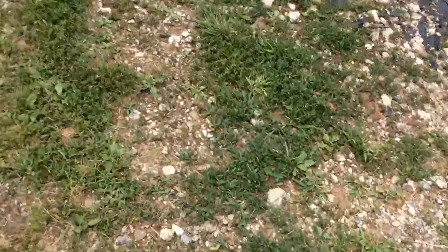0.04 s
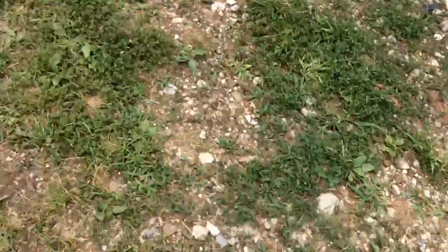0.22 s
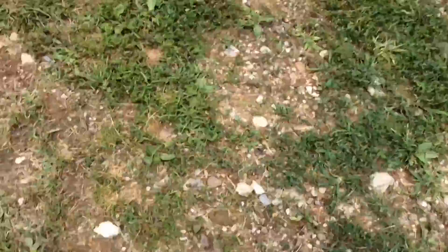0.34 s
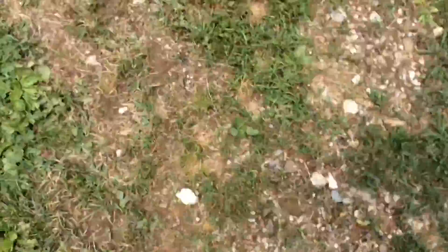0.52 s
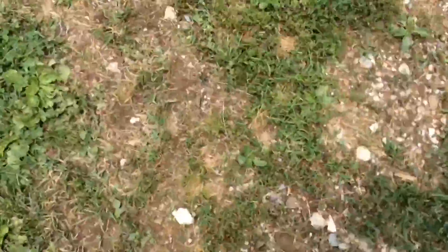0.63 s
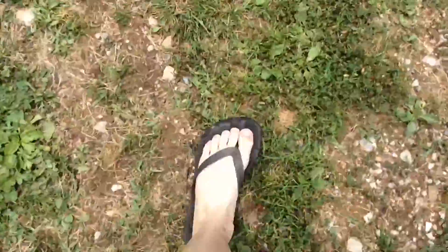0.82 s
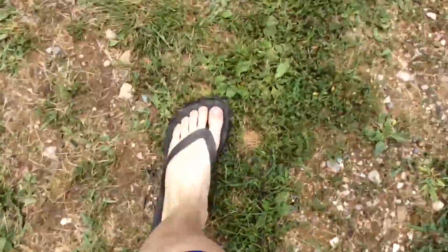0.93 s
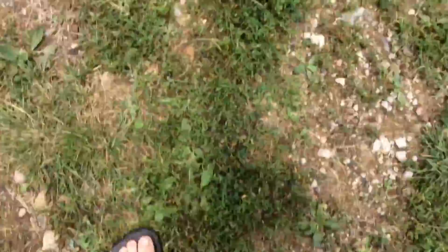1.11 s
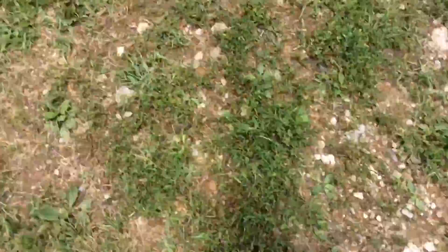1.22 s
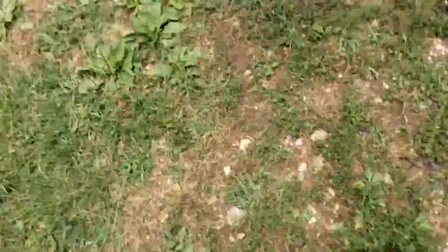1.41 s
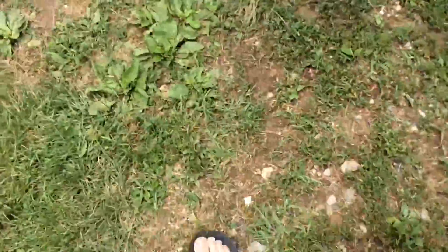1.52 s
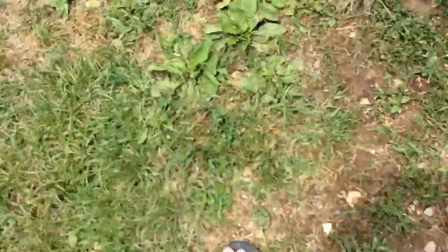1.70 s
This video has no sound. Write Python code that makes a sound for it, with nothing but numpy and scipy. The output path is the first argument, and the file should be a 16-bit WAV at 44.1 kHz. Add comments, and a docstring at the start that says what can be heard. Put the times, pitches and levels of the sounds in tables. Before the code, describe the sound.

Close footsteps in flip-flops start with a scuff and one sharp heel slap with a dull thud. The rubber then pops quietly as the soles rub over earth and grass and small stones click, over a faint outdoor hiss.

```python
"""Someone walks in flip-flops over dry, gritty ground with patches of grass.
First a sole scuffs the ground, then its rubber slaps once loudly against the heel, with a dull thud.
After that it keeps popping softly as it flexes under the foot, while the soles rub over earth, grit
and grass, small stones and stalks snap, and the footfalls thud. The walk ends in a soft swish of
grass. A faint hiss of still open air lies under it all."""
import sys
import numpy as np
from scipy import signal
from scipy.fft import rfft, irfft
from scipy.io import wavfile

SR = 44100
rng = np.random.default_rng(int(sys.argv[2]) if len(sys.argv) > 2 else 0)


def pcm_store(signal):
    """Save signal as 16-bit PCM."""
    levels = np.round(np.clip(np.atleast_2d(signal), -1, 1) * 32767)
    wavfile.write(sys.argv[1], SR, levels.astype(np.int16).T)


N = 77175
T = np.arange(N) / SR  # time of each sample [s]
HZ = np.maximum(np.arange(N // 2 + 1) * SR / N, 1)  # frequency of each point in a spectrum [Hz]


def sole_pops():
    """The rubber sole meets the foot: each pop swells, drops in pitch as the rubber settles, and dies."""
    # One row per pop; a low swell curve starts snappily, a high one softly.
    # (time [s], level [dB], start pitch [Hz], end pitch [Hz], swell [s], ring [s], swell curve [power],
    # roughness [0-1])
    pops = [ (0.218, 1, 2726, 389, 0.003, 0.0019, 3.2, 0.1),
            (0.2223, 1.3, 1736, 306, 0.0074, 0.0039, 2.15, 0.033),
            (0.238, -28, 720, 664, 0.0042, 0.0037, 1.2, .1),
            (0.3002, -39, 1400, 480, 0.0016, 0.0027, 0.89, .4),
            (0.4862, -33.5, 1590, 343, 0.0034, .004, 1.8, 0.55),
            (0.583, -44, 420, 351, 0.0049, 0.011, 1, .2), (0.6634, -33, 675, 358, 0.0037, 0.0038, 1.2, .3),
            (0.6847, -31, 890, 373.8, 0.0026, 0.0021, 2, 0.36),
            (0.744, -28, 4200, 423, 0.0017, 0.001, 0.33, 0.51),
            (0.7534, -29, 4550, 1680, 0.0017, 0.0011, 0.49, .3),
            (0.756, -30, 1510, 454, 0.0012, 0.0028, 0.68, 0.28),
            (0.9124, -25, 3450, 1530, 0.002, 0.00084, 0.36, .3),
            (0.9136, -21, 1730, 339, 0.0019, 0.0021, 0.51, 0.34),
            (0.9906, -31.5, 1390, 326, .0012, 0.0029, 1.15, 0.44),
            (1.1119, -29.5, 4280, 530, .003, 0.0021, 1.36, 0.27),
            (1.1642, -25.5, 4660, 436, .003, 0.0023, 0.61, 0.33),
            (1.3132, -36, 3220, 383, 0.00305, 0.0023, 0.59, 0.64),
            (1.3405, -42, 2410, 450, 0.0024, 0.0024, 0.31, 0.35),
            (1.358, -28.5, 3000, 390, .0012, 0.00063, 0.48, .5),
            (1.4155, -33, 1500, 550, 0.0023, 0.0017, 1.1, 0.37),
            (1.4192, -31, 940, 783, 0.0027, 0.0042, 0.56, 0.18),
            (1.4245, -32.5, 890, 543, 0.002, 0.00117, 1, .2),
            (1.4452, -30, 4090, 325, .0055, .004, 1.25, 0.42),
            (1.4495, -32.5, 2170, 520, 0.0036, 0.0023, 0.41, 0.77),
            (1.4873, -27, 1020, 365, 0.00293, 0.0037, 2.5, .2),
            (1.5559, -33, 3050, 900, .0038, 0.00098, 0.63, 0.73),
            (1.558, -25.5, 814, 578, 0.0044, .0032, 0.52, .15),
            (1.561, -33, 451, 392, 0.0055, 0.0033, 1.1, .2), ]
    glide_share, scatter_s = 0.2984, 0.0045
    out = np.zeros(N)
    age = T[:N // 20]  # time since the pop began
    for time_s, db, start_hz, end_hz, swell_s, ring_s, curve, roughness in pops:
        glide_s = glide_share * swell_s
        cycles = end_hz * age + (start_hz - end_hz) * glide_s * (1 - np.exp(-age / glide_s))
        rise = np.minimum(age / swell_s, 1) ** curve
        fade = np.exp(-np.maximum(age - swell_s, 0) / ring_s)
        pop = from_db(db) * rise * fade * np.sin(2 * np.pi * cycles)
        # Uneven contact smears the pop out in time and rings the hollow under the foot.
        scatter = rng.standard_normal(len(age)) * np.exp(-age / scatter_s)
        smear = signal.fftconvolve(pop, scatter / np.linalg.norm(scatter))[:len(age)]
        pop = pop + roughness * (smear + 2 * foot_hollow(pop))
        start = int(time_s * SR)
        out[start:start + len(age)] += pop
    bass_cut = signal.butter(2, 208, "high", fs=SR, output="sos")  # the pops keep little bass below about 200 Hz
    return signal.sosfilt(bass_cut, out + 1e-18)


def foot_hollow(pop):
    """The air between foot and sole rings briefly at a few pitches."""
    # The tones of this pocket of air: (pitch [Hz], width [Hz], level [dB])
    tones = [(356, 41, -8.5), (597.7, 51, -7.5), (1430, 67, 0.5), (2358, 250, 0.5), (2730, 130, -5)]
    return sum(from_db(db) * signal.lfilter(*signal.iirpeak(hz, hz / width_hz, fs=SR), pop)
               for hz, width_hz, db in tones)


def scuffs_and_crack():
    """The sole rubs over earth, grit and grass; two short, loud bursts are the crack of its heel slap."""
    # One row per contact; those at 0.219 s and 0.226 s are the slap's crack, the rest are scuffs.
    # (peak time [s], rise [s], fall [s], rub level [dB], crunch level [dB], swish level [dB],
    # swish centre [Hz], swish half width [octaves])
    contacts = [ (0.1195, 0.0018, 0.014, -72.5, -62, -59, 2030, 0.21),
                (0.192, 0.019, .02, -61, -52.5, -48.5, 4500, 1.5),
                (0.207, 0.015, 0.019, -45, -42.5, -41.5, 3600, 1.46),
                (0.219, 0.00088, 0.0031, -39, -24, -24.5, 4840, 0.41),
                (0.226, 0.0032, 0.0062, -15.5, -30.5, -31.5, 6040, 0.9),
                (0.264, 0.015, 0.046, -63, -61, -60.5, 3630, 0.14),
                (0.306, .005, .018, -45.5, -51, -46.5, 6920, 1),
                (0.39, 0.03, 0.021, -53.5, -65.5, -64, 4970, 1.5),
                (0.465, 0.06, 0.048, -68.5, -63, -58.5, 4750, .3),
                (0.495, 0.0093, 0.012, -43, -48.5, -79, 4500, .6),
                (0.547, 0.019, 0.027, -48, -53.5, -57.5, 5150, 0.68),
                (0.596, 0.022, 0.02, -49.5, -57, -78, 4500, 0.67),
                (0.668, 0.0193, 0.021, -45, -62.5, -60.5, 7000, 1.17),
                (0.689, 0.011, 0.0091, -50, -61.5, -65, 5000, 1.4),
                (0.754, 0.01, 0.01, -41, -47, -64, 2980, .6),
                (0.853, 0.011, 0.0098, -50.5, -54, -54.5, 7940, 1.9),
                (0.919, 0.032, 0.019, -51.5, -46, -47, 5560, 0.79),
                (0.96, 0.02, 0.03, -55, -52.5, -49.5, 5600, .8),
                (1, 0.0056, 0.02, -50, -54.5, -68, 4930, 0.48),
                (1.066, 0.026, 0.028, -55.5, -55, -59, 5500, .9),
                (1.129, 0.012, 0.033, -53.5, -53.5, -73, 4220, 0.47),
                (1.16, 0.012, 0.013, -56.5, -55, -68, 3980, 0.68),
                (1.212, 0.0058, 0.0079, -49, -58, -83, 4980, .6),
                (1.245, 0.017, 0.04, -55, -57.5, -63.5, 4470, 0.56),
                (1.308, 0.011, 0.04, -52.5, -62, -73, 4060, 0.72),
                (1.366, 0.012, 0.033, -55.5, -53.5, -69, 5000, 2.1),
                (1.418, 0.012, 0.012, -50, -56, -68, 4500, 0.53),
                (1.46, 0.014, 0.048, -51, -61.5, -74, 4500, 0.52),
                (1.565, .06, 0.11, -85, -68.5, -58.5, 11400, 0.51),
                (1.57, 0.0091, 0.0076, -43.5, -51, -55.5, 5040, 1.25),
                (1.58, 0.0605, 0.064, -87, -74, -59, 3960, 0.23),
                (1.691, 0.0033, .011, -61.5, -57, -59.5, 8060, 0.92),
                (1.735, 0.019, .04, -60.5, -57, -55, 7020, 2.1), ]
    # The tone colour of the dull rub: (frequency [Hz], relative level [dB])
    rub_spectrum = [(90, -33), (170, -7.5), (240, -2.5), (340, 0), (560, -1), (800, -6), (1300, -16),
                    (3000, -38), (8000, -61.5)]
    # The tone colour of the brighter crunch: (frequency [Hz], relative level [dB])
    crunch_spectrum = [(300, -24.5), (700, -7.5), (1100, -1.5), (2000, -1), (3200, -4.5), (5000, -11),
                       (9000, -25), (16000, -34.5)]
    rub = coloured(grains(), rub_spectrum)
    crunch = coloured(grains(), crunch_spectrum)
    swish_noise = grains()
    out = np.zeros(N)
    for peak_s, rise_s, fall_s, rub_db, crunch_db, swish_db, swish_hz, octaves in contacts:
        swish = hump(swish_noise, swish_hz, octaves, floor_db=-25)
        blend = from_db(rub_db) * rub + from_db(crunch_db) * crunch + from_db(swish_db) * swish
        out += swell(peak_s, rise_s, fall_s) * blend
    return out


def grains():
    """Countless tiny contacts of uneven size click over the smooth noise of rubbing."""
    grains_per_s, spread_db, smooth_share = 3500, 2.5, 0.63
    sizes = from_db(spread_db * np.minimum(rng.exponential(1, N), 4))
    signs = rng.choice([-1, 1], N)
    touches = rng.random(N) < grains_per_s / SR
    clicks = unit_power(sizes * signs * touches)
    return clicks + smooth_share * rng.standard_normal(N)


def snaps():
    """Small stones and dry stalks snap: bright bursts that start at once and die in milliseconds."""
    # One row per snap: (time [s], level [dB], centre [Hz], half width [octaves], fall [s])
    bursts = [ (0.1878, -43, 4000, 2.6, 0.0023), (0.5462, -29.5, 7000, 2.7, .0013),
              (0.67, -48, 6900, 1.3, 0.00086), (0.7442, -36.5, 2600, 0.9, 0.00078),
              (0.7544, -32, 3280, 0.29, 0.0014), (0.8118, -52, 4430, 0.28, 0.00065),
              (0.847, -40, 12480, 0.46, 0.0032), (1.024, -46, 5400, 0.65, .001),
              (1.0621, -49, 12260, 0.64, 0.0014), (1.1121, -41.5, 4100, 0.28, 0.00077),
              (1.1642, -37.5, 3600, 0.18, 0.0022), (1.177, -47, 4500, 0.73, .0012),
              (1.2141, -40, 5930, 3.2, 0.002), (1.3572, -39.5, 6500, 1.7, 0.0014),
              (1.3652, -37, 3100, 0.26, 0.00091), (1.3726, -41, 3200, 0.21, 0.00092),
              (1.4459, -42, 2720, 0.57, 0.0027), (1.4875, -41.5, 1340, 0.36, 0.0026),
              (1.488, -49.5, 5900, 0.93, 0.00089), (1.7244, -40.5, 3550, 0.17, 0.0028), ]
    noise = rng.standard_normal(N)
    return sum(from_db(db) * swell(time_s, 2 / SR, fall_s) * hump(noise, hz, octaves, floor_db=-21.5)
               for time_s, db, hz, octaves, fall_s in bursts)


def thuds():
    """The walker's weight lands and shifts, each time with a short, low rumble."""
    # One row per shift of weight: (peak time [s], rise [s], fall [s], level [dB])
    footfalls = [(0.235, 0.0046, .008, -28), (0.386, 0.01, .012, -40), (0.408, 0.015, 0.018, -43.5),
                 (0.51, 0.02, 0.0233, -48.5), (0.562, 0.0236, 0.0069, -43.5), (0.669, .02, .02, -58),
                 (0.856, 0.0074, 0.0099, -47), (0.994, .006, .014, -50), (1.362, 0.005, 0.0087, -46),
                 (1.565, .005, .012, -58), (1.742, 0.0134, 0.0168, -60)]
    # The deep tone colour of a thud: (frequency [Hz], relative level [dB])
    thud_spectrum = [(20, -25.5), (45, -8.5), (72, 1.5), (105, 1), (150, -15), (300, -34), (1000, -63)]
    rumble = coloured(rng.standard_normal(N), thud_spectrum)
    phase = np.angle(signal.hilbert(rumble))  # keeps the wave's swing, drops its changes in strength
    even_rumble = coloured(np.cos(phase), thud_spectrum)
    weight = sum(from_db(db) * swell(peak_s, rise_s, fall_s) for peak_s, rise_s, fall_s, db in footfalls)
    return even_rumble * weight


def open_air():
    """Still outdoor air makes a faint, steady hiss."""
    # The tone colour of the hiss: (frequency [Hz], relative level [dB])
    air_spectrum = [(20, -5), (60, -0.5), (160, 6.5), (300, -5), (800, -6.5), (2000, -13), (3800, -12.5),
                    (6500, -20), (12000, -16), (16000, -28.5)]
    return from_db(-63.5) * coloured(rng.standard_normal(N), air_spectrum)


def from_db(db):
    """Turn decibels into a number to multiply by."""
    return 10 ** (np.asarray(db) / 20)


def unit_power(x):
    """Scale a sound so that its average power is 1."""
    return x / np.sqrt(np.mean(x ** 2) + 1e-20)


def coloured(x, spectrum):
    """Give a steady noise the tone colour in a table, at power 1."""
    hz, db = np.transpose(spectrum)
    gain = from_db(np.interp(np.log(HZ), np.log(hz), db))
    return unit_power(irfft(rfft(x) * gain, N))


def hump(x, centre_hz, octaves, floor_db):
    """Make one band of a noise stand out above a low floor, at power 1."""
    gain = np.exp(-.5 * (np.log2(HZ / centre_hz) / octaves) ** 2) + from_db(floor_db)
    return unit_power(irfft(rfft(x) * gain, N))


def swell(peak_s, rise_s, fall_s):
    """A loudness curve: a rounded rise to the peak, then a fading tail."""
    loss = np.where(T < peak_s, ((T - peak_s) / rise_s) ** 2, (T - peak_s) / fall_s)
    return np.exp(-np.minimum(loss, 20))


def scene():
    """The steps, close and without echo, over the outdoor hiss, in one channel."""
    return (sole_pops() + scuffs_and_crack() + snaps() + thuds() + open_air())[None]


def record(dry):
    """Clip any peak of the loud slap at full scale, then cut the highest treble steeply."""
    cutoff_hz = 15400
    treble_cut = signal.ellip(10, .2, 80, cutoff_hz, fs=SR, output="sos")
    return signal.sosfilt(treble_cut, np.clip(dry, -1, 1))


dry = scene()
out = record(dry)
pcm_store(out)
```